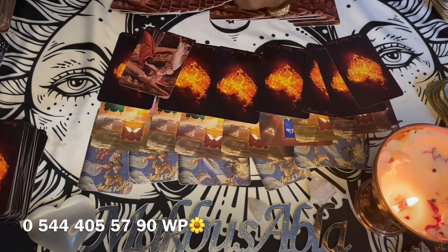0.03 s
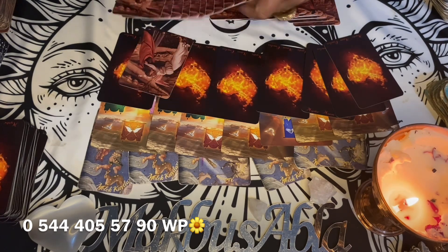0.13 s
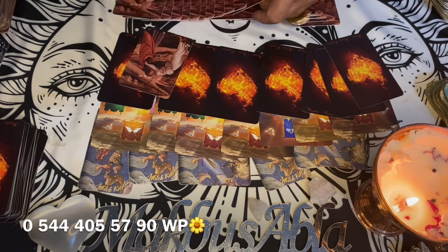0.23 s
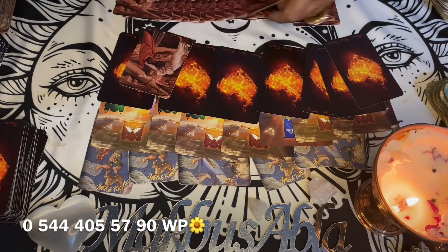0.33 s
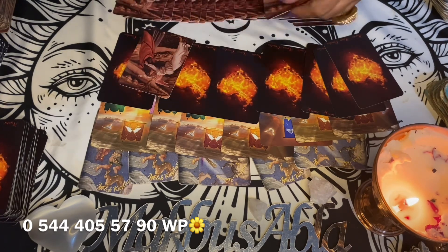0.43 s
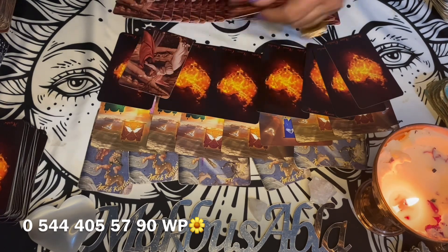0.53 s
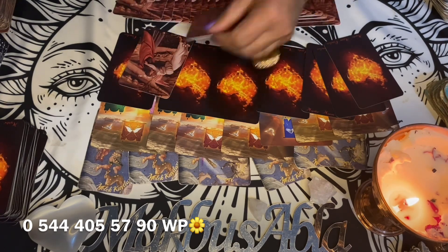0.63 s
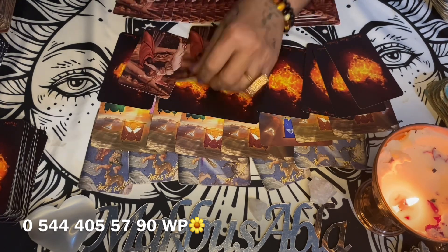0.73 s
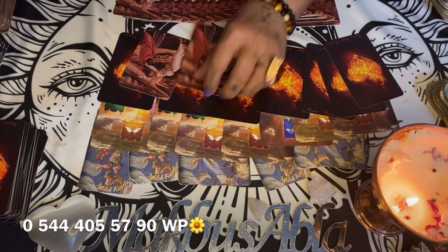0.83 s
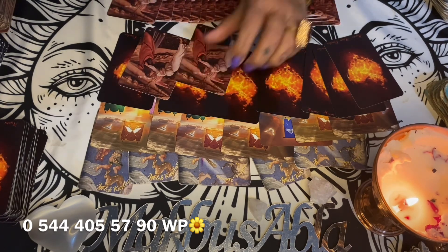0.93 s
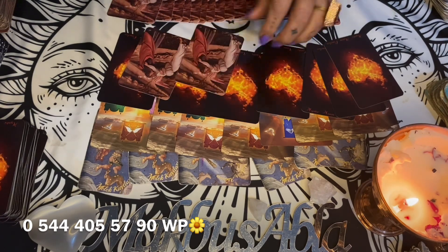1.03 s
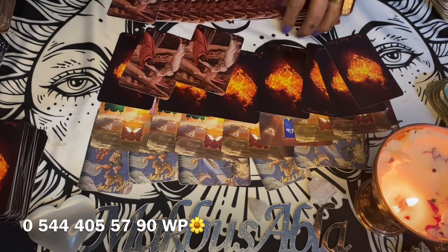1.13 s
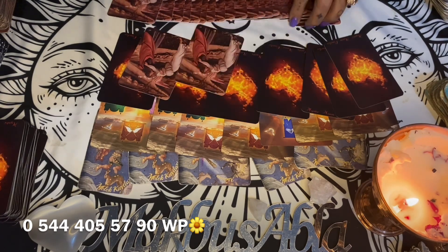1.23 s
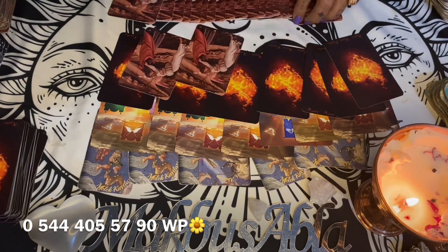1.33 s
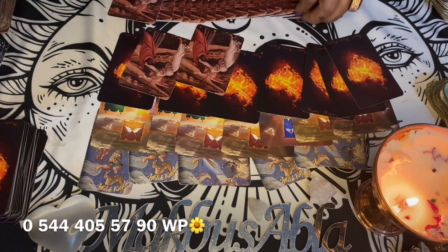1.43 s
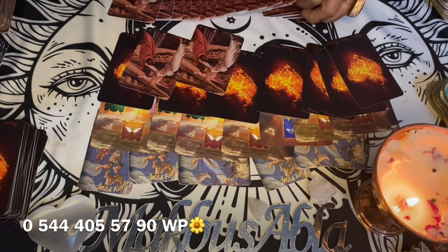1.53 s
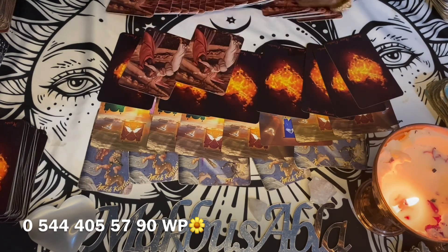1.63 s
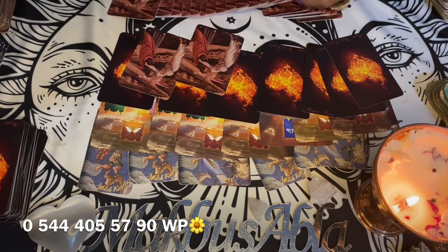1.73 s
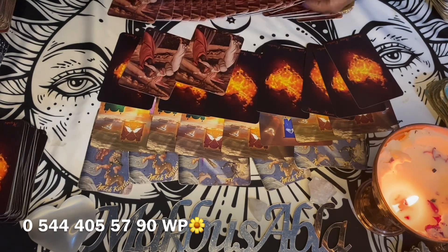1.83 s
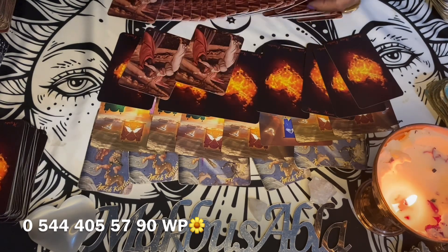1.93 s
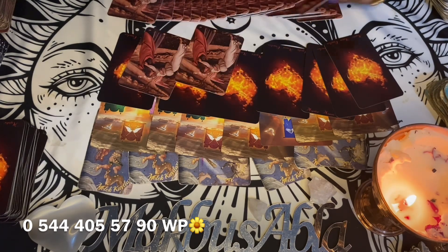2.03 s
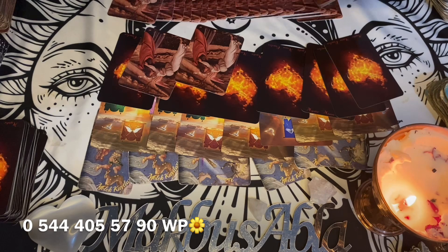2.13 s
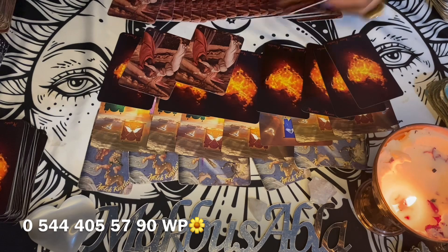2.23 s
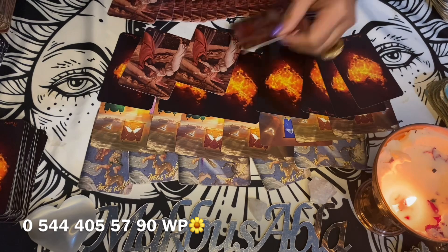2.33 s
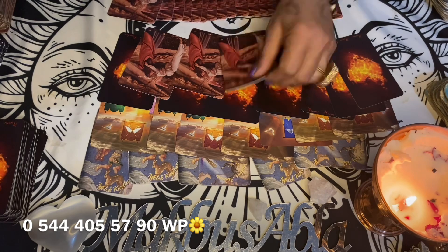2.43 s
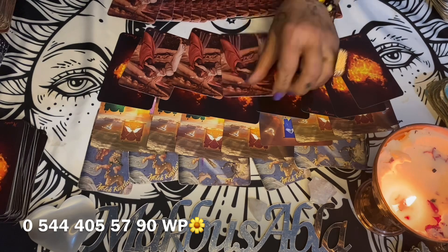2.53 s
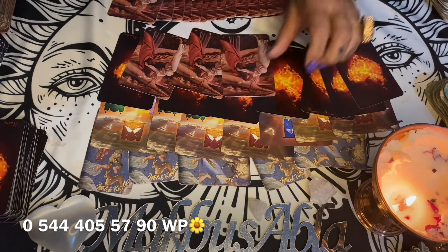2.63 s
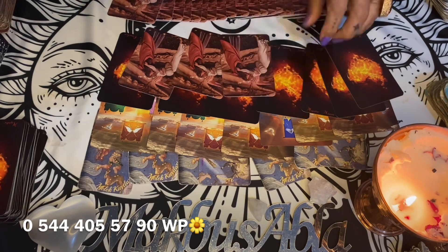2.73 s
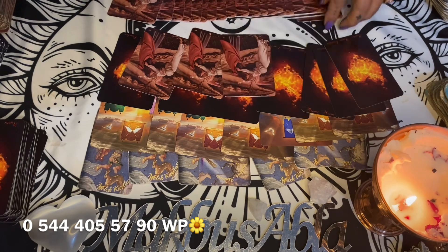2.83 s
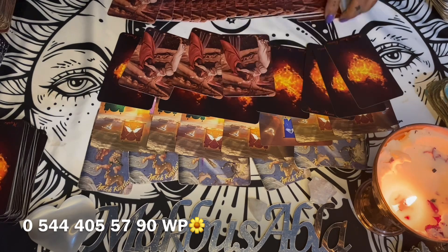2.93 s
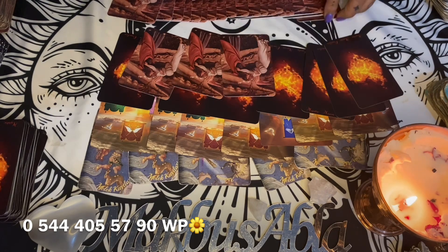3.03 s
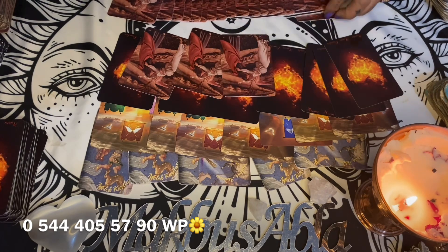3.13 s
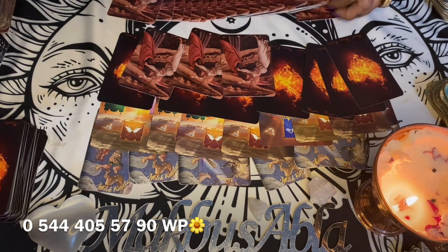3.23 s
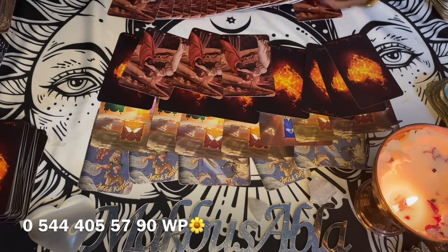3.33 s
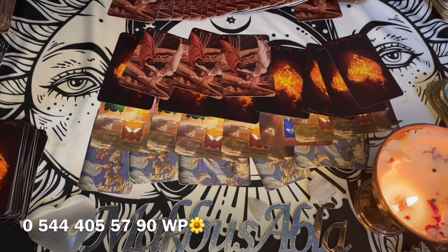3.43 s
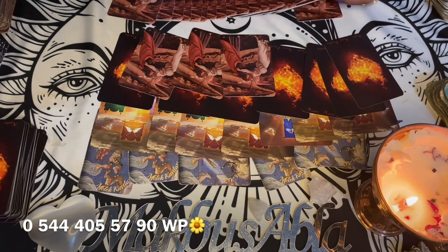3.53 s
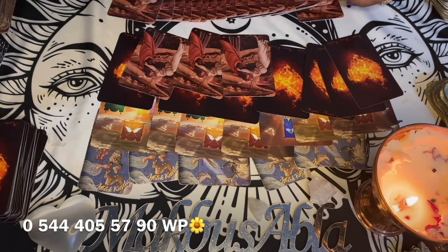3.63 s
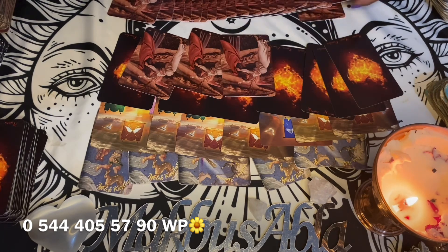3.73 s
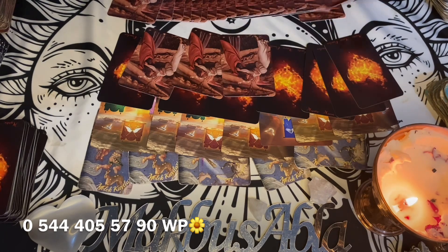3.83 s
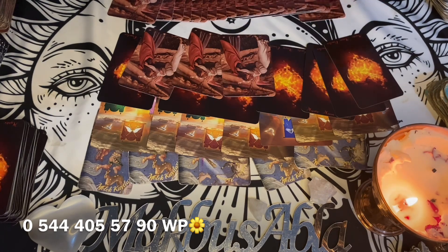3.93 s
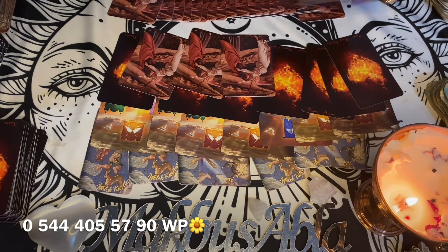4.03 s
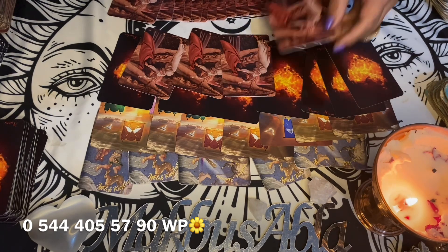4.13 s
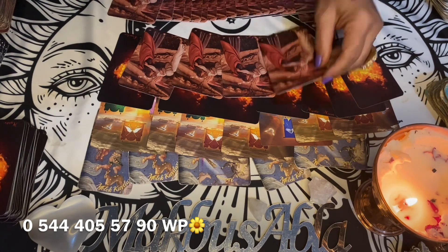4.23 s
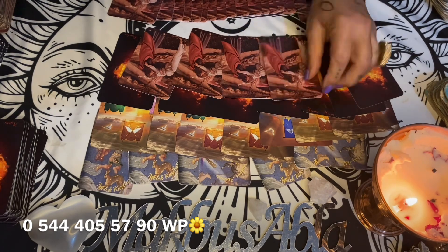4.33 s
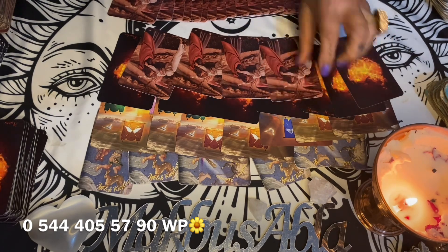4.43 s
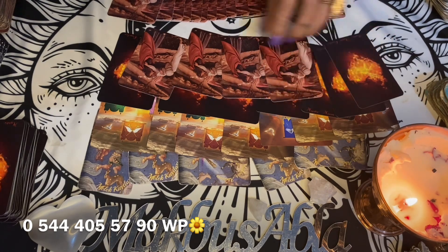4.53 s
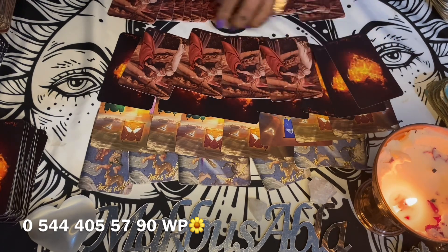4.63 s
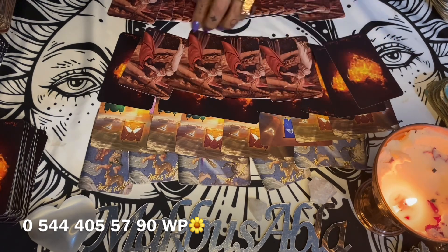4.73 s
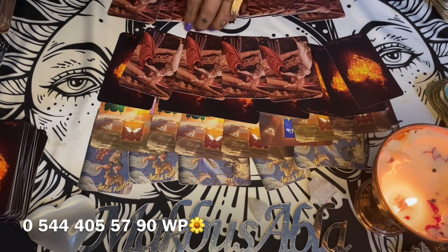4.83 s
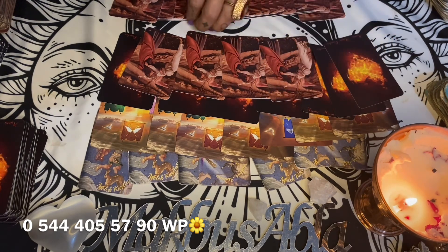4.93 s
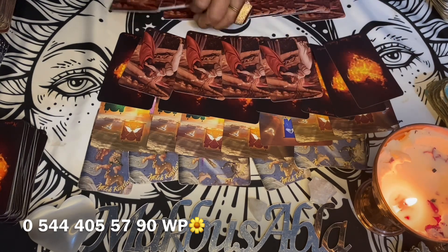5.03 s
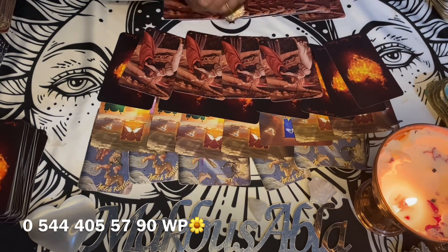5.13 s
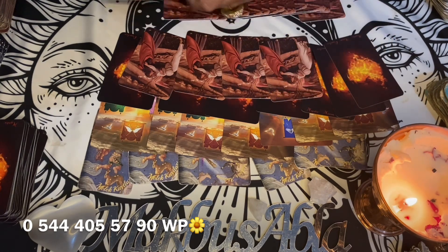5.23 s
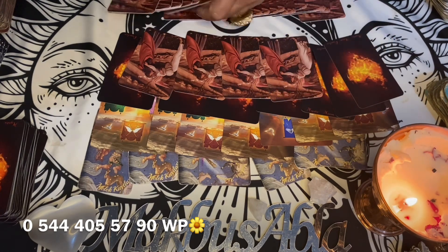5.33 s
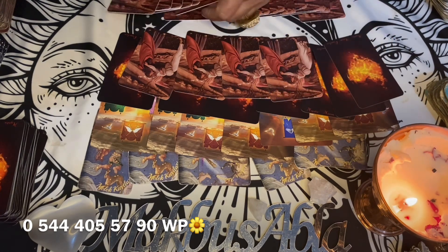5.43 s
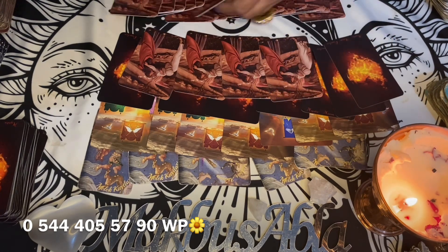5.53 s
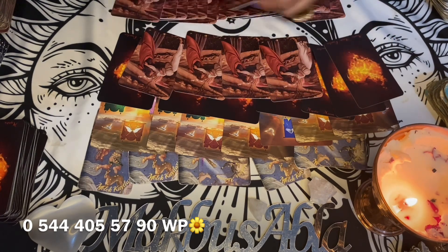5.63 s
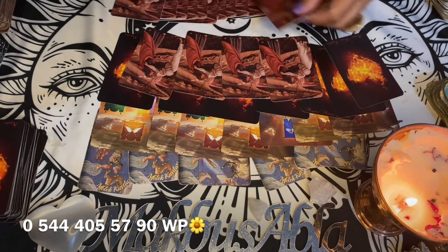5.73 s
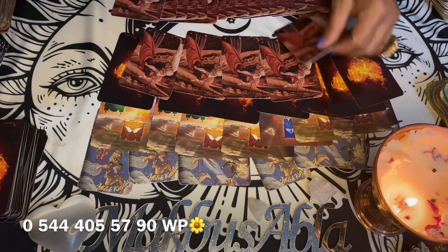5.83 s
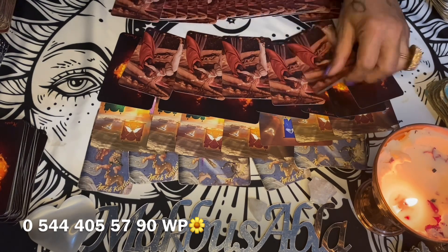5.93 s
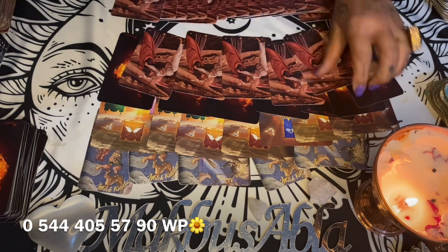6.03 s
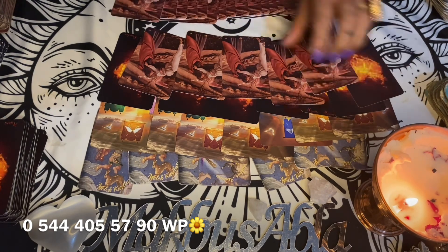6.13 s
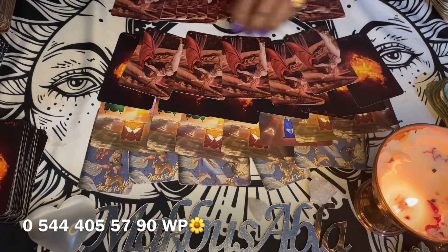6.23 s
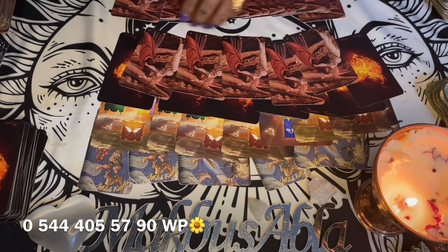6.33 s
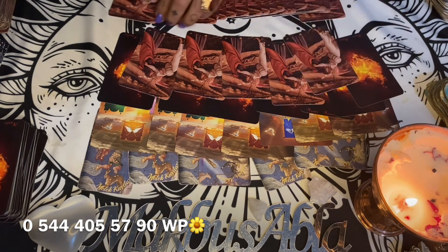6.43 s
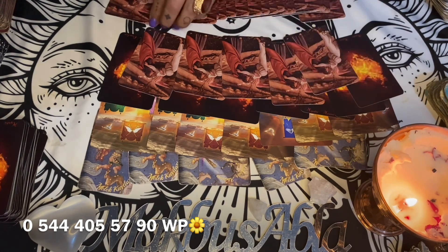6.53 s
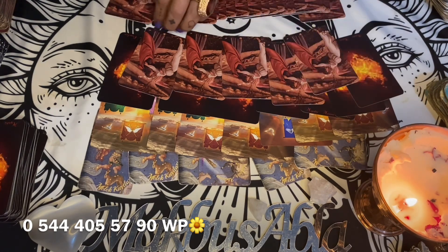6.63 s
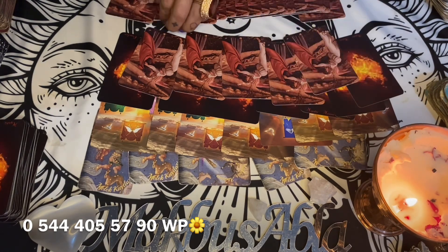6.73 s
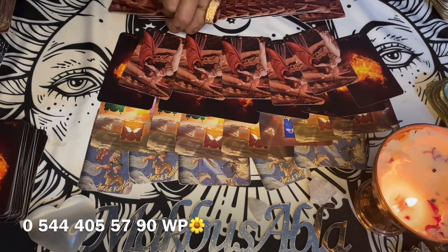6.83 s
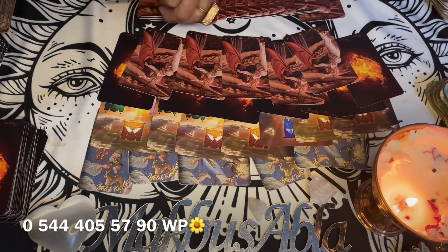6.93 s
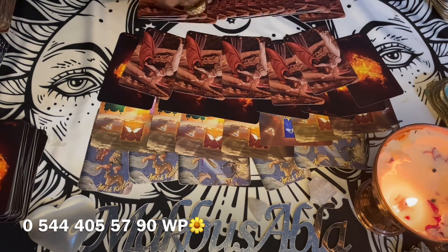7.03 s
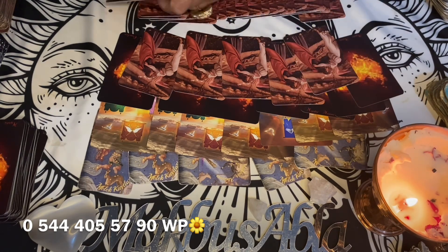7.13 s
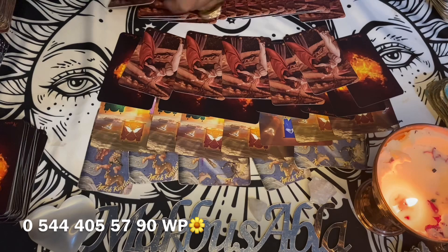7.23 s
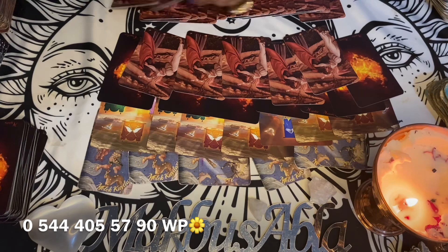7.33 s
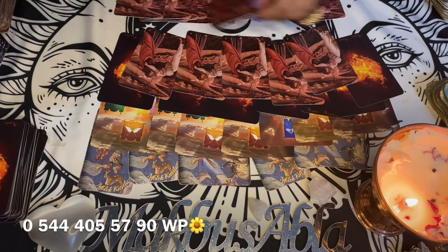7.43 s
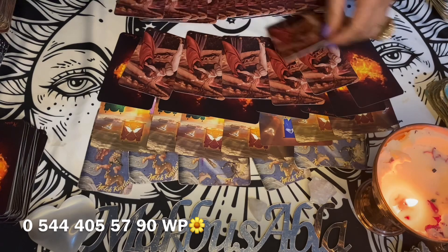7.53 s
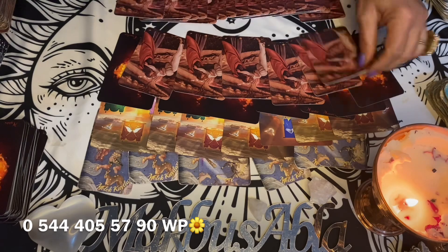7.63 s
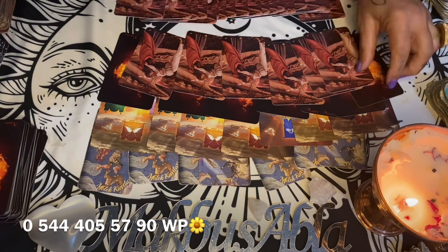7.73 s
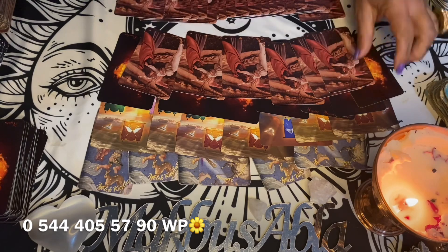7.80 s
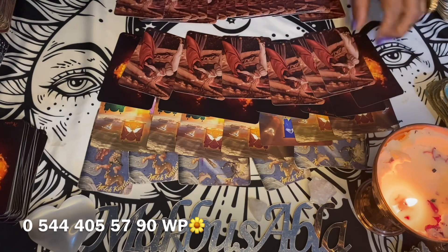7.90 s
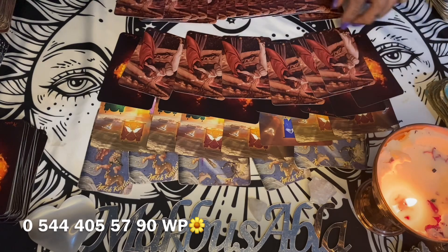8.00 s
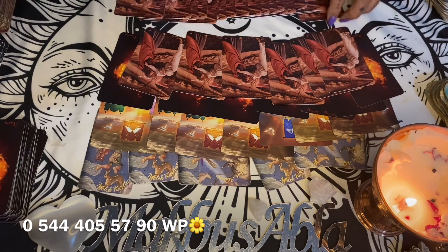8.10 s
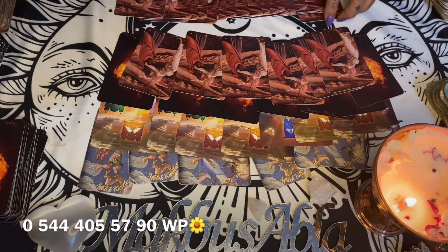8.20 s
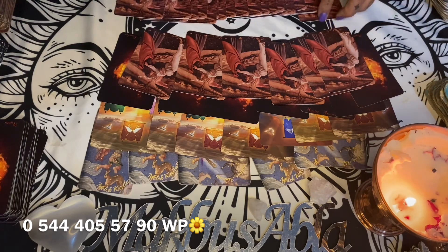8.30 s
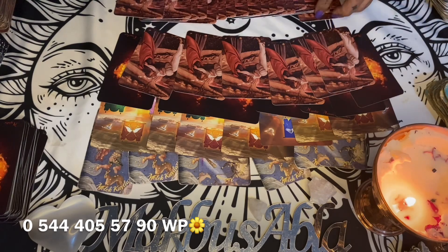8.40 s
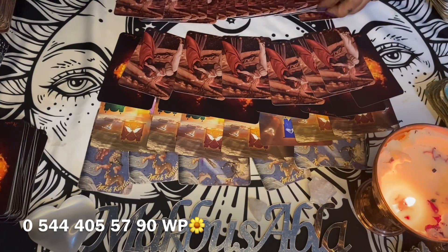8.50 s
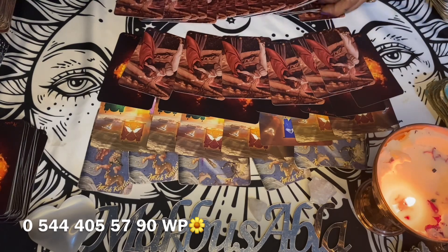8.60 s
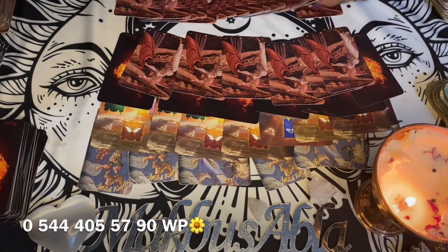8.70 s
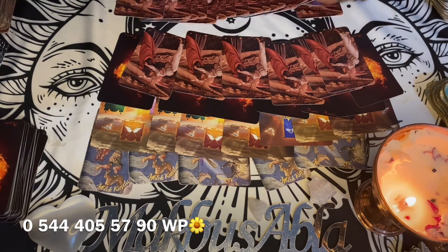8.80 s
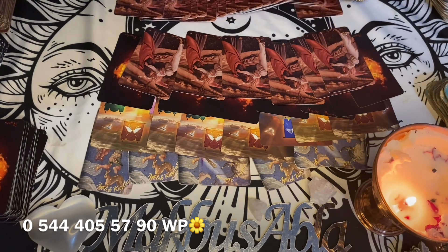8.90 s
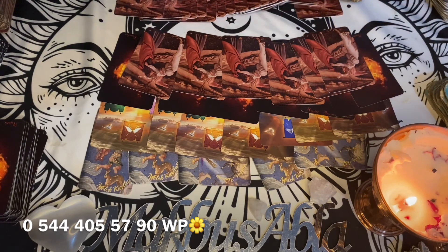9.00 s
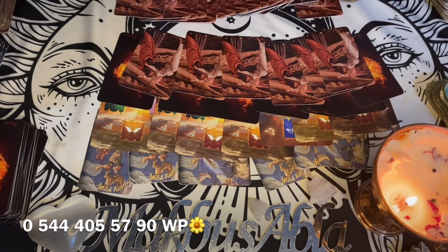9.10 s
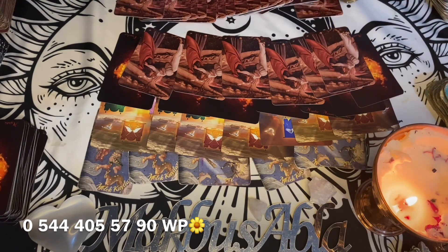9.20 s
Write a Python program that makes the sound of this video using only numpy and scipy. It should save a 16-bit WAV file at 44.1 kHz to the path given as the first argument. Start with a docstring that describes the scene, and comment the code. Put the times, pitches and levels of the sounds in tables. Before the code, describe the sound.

Close stereo pickup in a small room with a steady low machine hum. Stiff cards are dealt at an unhurried pace: crisp edge snaps, brushing slides over cloth and occasional dull knocks from hand and wrist. The sharpest snap comes near two and a half seconds; a short creak with a thin falling squeak comes near seven and a half, before the final flicks.

```python
"""A low machine hum and a faint rustle run throughout; cards and hands sweep the cloth in strokes of shaped noise.
Card edges snap from the first moments, as noise bursts ringing resonances, each with a skid of noise around it.
From 0.6 s wrist and fingers knock the table now and then, as short forces ringing its modes; the sharpest snap
falls near 2.5 s, and near 7.5 s something creaks, as chattering noise with a thin gliding squeak, before the
last snaps. Snaps and knocks also sound through a decaying room; two microphone ports hear the whole."""
import sys
import numpy as np
from scipy import signal
from scipy.fft import rfft, irfft, next_fast_len
from scipy.io import wavfile
from scipy.ndimage import uniform_filter1d, map_coordinates

SR = 44100
rng = np.random.default_rng(int(sys.argv[2]) if len(sys.argv) > 2 else 0)


def transcribe(signal):
    """Save signal, clipped to [-1, 1], as a 16-bit WAV file at the path in sys.argv[1]."""
    frames = np.atleast_2d(signal).T
    limited = np.clip(frames, -1, 1)
    pcm = np.round(limited * 32767).astype(np.int16)
    wavfile.write(sys.argv[1], SR, pcm)


def volts(x):
    """Linear amplitude factor 10**(x/20) for a level x in dB, scalar or array-like."""
    e = np.asarray(x, float) / 20
    return 10 ** e


N = 408366  # samples


def unit(x):
    """Normalization: a signal scaled to rms 1."""
    return x / np.sqrt(np.mean(x ** 2) + 1e-20)


def along(points, hz):
    """Logarithmic frequency scale: (Hz, value) points interpolated along it."""
    knots_hz, values = np.transpose(points)
    return np.interp(np.log(hz + 1), np.log(knots_hz + 1), values)


def wobble(rate):
    """Band-limited fluctuation: a smooth random curve with rate knots a second."""
    knots = rng.standard_normal(int(N * rate / SR) + 4)
    return map_coordinates(knots, [np.arange(N) * rate / SR])


def filtered(x, response):
    """Linear filtering: the spectrum of x times a complex response of frequency."""
    size = next_fast_len(N + SR // 2)
    return irfft(rfft(x, size) * response(np.fft.rfftfreq(size, 1 / SR)), size)[..., :N]


def colour(points):
    """Spectral colouring: the gain curve of a table of (Hz, dB)."""
    return lambda hz: volts(along(points, hz))


def resonant(modes):
    """Modal superposition: causal resonances of (Hz, width Hz, dB), in alternating sign."""
    def response(hz):
        total = 0
        for k, (centre, width, db) in enumerate(modes):
            peak = 1j * hz * width / (centre * centre - hz * hz + 1j * hz * width)
            total = total + (-1) ** k * volts(db) * peak
        return total
    return response


def swell(length):
    """Transient excitation: a burst that swells to 1 after length seconds and dies away."""
    u = np.arange(SR // 4) / SR / max(length, 1 / SR)
    return u * u * np.exp(2 * (1 - u))


def pair(alike, response, patchy_db=0):
    """Interchannel coherence: coloured noise of rms 1 at two ports, in patches of random gain."""
    z = signal.stft(rng.standard_normal((2, N)), nperseg=256)[2]
    field = uniform_filter1d(rng.standard_normal(z.shape[1:]), size=4, axis=0)
    field = uniform_filter1d(field, size=8, axis=1)
    noise = signal.istft(z * volts(patchy_db * unit(field)), nperseg=256)[1][:, :N]

    def mixing(hz):
        angle = np.arccos(np.clip(along(alike, hz), -1, 1)) / 2
        return response(hz) * [np.cos(angle), np.sin(angle)]

    mid, side = filtered(noise, mixing)
    return unit(np.array([mid + side, mid - side]))


# likeness of the two ports for sounds close by: frequency_hz, coherence (0-1)
NEAR_LIKENESS = [(300, .97), (600, .55), (1000, .85), (1800, .95), (2900, .6), (3800, .8), (4500, .7),
                 (5500, .975), (16000, .975)]


def rung(envelope, modes):
    """Forced resonance: enveloped noise rings modes, at rms 1 where the envelope stays at 1."""
    noise = pair(NEAR_LIKENESS, np.ones_like)
    return filtered(envelope * noise, resonant(modes)) / np.std(filtered(noise, resonant(modes)))


# card edges and nails catching and letting go; the last three levels are relative to level_db:
# time_s, level_db, lowest_resonance_db, upper_resonances_db, hiss_db
SNAPS = [(0.132, -54.5, -15, -6, -10), (0.2149, -51, 7.5, 3, 1), (0.333, -58.5, 0, -12, -9),
         (0.637, -45, 0, -8.5, -6.5), (0.7051, -41.5, -7, -4.5, -28), (0.7162, -37.5, 2, -6, -12),
         (0.7568, -41, 2, 1, -2.5), (0.8079, -44.5, -4, 0.5, -3.5), (0.8275, -53.5, -14, -0.5, -24),
         (0.8928, -56, 0, 0, -16), (1.1554, -49.5, -6.5, -25, -38), (2.0646, -41.5, -2, -0.5, 0.5),
         (2.3455, -47, -3, -6.5, -25), (2.4794, -28.5, -15.5, 0.5, -5.5), (2.5025, -33, -29, -2.5, -6.5),
         (2.845, -56.5, 5.5, -20.5, -19.5), (3.0667, -55, -13, -13.5, -2), (3.6006, -46, 3.5, 3.5, 0),
         (3.848, -55, -4, -12.5, -3), (4.1798, -46.5, 1.5, -8, -21), (4.2007, -47, -2, -6, -2),
         (4.286, -57, -9.5, 1.5, -2.5), (4.3109, -33, 2.5, 5, 6.5), (4.3215, -37.5, -26, -5.5, 2),
         (4.3312, -38, -15, -1, -19.5), (4.5535, -60, 8, -6, 8), (4.7116, -59.5, -2.5, 1.5, -2.5),
         (4.833, -62, 11, -12, -27), (5.236, -69.5, -12, 5.5, 18.5), (5.561, -50.5, -10, -2, -3.5),
         (5.599, -46.5, -13, -2.5, -2), (5.7634, -55, 0, -13, -24), (5.773, -43, -4, -15, -10.5),
         (5.9353, -41, -3.5, -9, -5), (5.9456, -43, -14, -0.5, -1), (5.9556, -41, -16, -3, -2.5),
         (5.9717, -47, -9, -4, -7.5), (5.9852, -37.5, -17, -2, -2.5), (7.009, -61.5, -14, -30, -8),
         (7.059, -64, -2, -25, -20), (7.218, -60, -17.5, 3, 0), (7.352, -41, -14, -4, -5),
         (7.3591, -37.5, -18, -3, -12.5), (7.4816, -56, -5, -12, -27), (7.505, -50, -24, -21.5, -8),
         (7.6617, -44.5, -9.5, -2, -2.5), (7.6751, -41.5, -5, 5, -0.5), (7.7012, -44, -1, 3.5, -0.5),
         (8.096, -54.5, -5, -7, 1.5), (8.554, -73.5, -4, 8, 20), (8.5846, -71, 1, 1, 14.5),
         (8.982, -64.5, 5, -8, 2), (8.6773, -46, -8.5, -3.5, 4.5), (8.6974, -37.5, -5, 0, -4.5),
         (9.01, -52, -5, -3, 7), (9.0192, -49.5, -9, -3, -20.5), (9.0437, -59, -1, -4, -18)]
# resonances that colour the snaps: frequency_hz, width_hz, level_db
SNAP_RESONANCES = [(1050, 450, 0), (1980, 480, 0), (3230, 450, 0), (3950, 500, -4), (5110, 600, 0)]
# colour of the snap's hiss: frequency_hz, gain_db
SNAP_HISS = [(4500, -27.5), (6000, -5), (10000, -6), (14000, -10), (15800, -13), (16600, -50.5)]


def snaps():
    """Sudden release: a short burst rings resonances at its own strengths, with a hiss on top."""
    rise_s = 0.002
    burst = np.zeros((5, N + SR // 4))
    shape = swell(rise_s) + 0.2 * swell(4 * rise_s)  # the card flutters on a little
    for s, db, low_db, upper_db, hiss_db in SNAPS:
        edge_db = (upper_db + hiss_db) / 2 - 2.5  # the top resonance lies between ring and hiss
        strength = volts(db + np.array([low_db, 0, upper_db, edge_db, hiss_db]))
        start = round((s - .0015) * SR)
        burst[:, start:start + SR // 4] += np.outer(strength, shape)
    low, body, upper, edge, hiss = burst[:, :N] / 2 ** .5  # peak to rms
    ring = rung(low, SNAP_RESONANCES[:1]) + rung(body, SNAP_RESONANCES[1:2])
    ring = ring + rung(upper, SNAP_RESONANCES[2:4]) + rung(edge, SNAP_RESONANCES[4:])
    return ring + hiss * pair(NEAR_LIKENESS, colour(SNAP_HISS))


# course of the creak: time_s, lower_bands_db, upper_bands_db, squeak_hz, squeak_db
CREAK = [(7.43, -80, -85, 2300, -90), (7.445, -61, -69, 2300, -90), (7.5, -63, -79, 2300, -85),
         (7.51, -52, -53, 2300, -63), (7.53, -65.5, -66, 2150, -58), (7.56, -64, -64, 1900, -60),
         (7.6, -69, -67, 1780, -61), (7.63, -72, -76, 1750, -83)]
# bands of the creak, each passed through twice: frequency_hz, width_hz, level_db (per pass)
CREAK_BANDS = [(740, 130, -3), (1500, 210, 0), (2420, 170, 0), (3950, 300, -9)]


def creak():
    """Amplitude modulation: a creak chatters in four bands; a thin squeak and its octave glide down."""
    s, *columns = np.transpose(CREAK)
    t = np.arange(N) / SR
    low_db, high_db, squeak_hz, squeak_db = (np.interp(t, s, v) for v in columns)
    flutter = unit(volts(5 * wobble(130)))

    def band(modes):
        return pair(NEAR_LIKENESS, lambda hz: resonant(modes)(hz) ** 2)

    chatter = flutter * (volts(low_db) * band(CREAK_BANDS[:2]) + volts(high_db) * band(CREAK_BANDS[2:]))
    phase = 2 * np.pi * np.cumsum(squeak_hz + 80 * wobble(300)) / SR
    tone = np.sin(phase) + volts(-11) * np.sin(2 * phase)
    squeak = volts(squeak_db + 3 * wobble(80)) * tone
    return (chatter + squeak) * ((t > s[0]) & (t < s[-1]))


# strokes of cards and hands over the cloth: middle_s, length_s, weave_db, hollow_db, hiss_db
STROKES = [(0.05, 0.13, -81, -67, -84.5), (0.149, 0.15, -71.5, -69.5, -64.5), (0.267, 0.16, -70, -65, -68),
           (0.655, 0.097, -75, -66, -78), (0.817, 0.19, -62.5, -60, -62.5),
           (1.093, 0.52, -73.5, -72.5, -77), (1.26, 0.094, -64.5, -75, -63),
           (1.372, 0.15, -71.5, -69.5, -71.5), (1.698, 0.16, -81, -73, -87), (1.857, 0.3, -84, -74, -75.5),
           (2.027, 0.12, -67.5, -69, -59.5), (2.422, 0.14, -65.5, -65.5, -71.5),
           (2.866, 0.29, -69.5, -70.5, -68), (3.108, 0.18, -76, -82, -76.5), (3.36, 0.053, -95, -95, -82),
           (3.57, 0.28, -70, -73.5, -66.5), (3.75, 0.18, -70.5, -70, -71), (3.837, 0.078, -64, -63, -62),
           (4.25, 0.092, -69, -67.5, -76.5), (4.585, 0.51, -64, -61, -63.5), (4.93, .26, -70.5, -78, -74),
           (5.341, 0.17, -75.5, -103, -64.5), (5.534, 0.13, -66.5, -73, -59.5),
           (5.593, 0.062, -56.5, -54.5, -62), (5.851, 0.25, -65, -64, -69.5),
           (5.967, 0.048, -51, -48.5, -56), (6.11, 0.27, -74, -74, -76.5), (6.45, 0.18, -64.5, -66.5, -65),
           (6.766, 0.28, -71, -80, -71.5), (7.008, 0.17, -94, -80, -75.5), (7.178, .07, -74, -87, -66),
           (7.301, 0.14, -59, -59.5, -57.5), (7.568, 0.28, -65.5, -63.5, -65.5),
           (8.046, 0.38, -64.5, -63, -64.5), (8.35, 0.096, -82, -79, -75), (8.658, 0.13, -61.5, -67, -63),
           (8.823, .2, -78, -86, -80), (8.992, 0.13, -72, -82, -68), (9.154, 0.19, -70.5, -74, -72)]
# faint rustle that never stops: weave_db, hollow_db, hiss_db
REST_DB = (-88.5, -82, -89.5)


def rubbing():
    """Power addition: rest, strokes and a skid around each snap sum to weave, hollow and hiss strength."""
    end_fall_db, flatness = 10.5, 1.5  # fall at the ends of a stroke; higher = flatter top, steeper ends
    skid_db = np.array((-18.5, -14, -24))  # under the snap: weave, hollow, hiss
    skid_t60_s, drag_t60_s = 0.35, 0.041  # a released card skids on; the skid builds up just before
    t = np.arange(0, N / SR + .002, .002)
    power = volts(2 * np.array(REST_DB))[:, None] * np.ones(len(t))
    for middle, length, *dbs in STROKES:
        fall_db = end_fall_db * np.abs(2 * (t - middle) / length) ** flatness
        power += np.outer(volts(2 * np.array(dbs)), volts(-2 * fall_db))
    for s, db, low_db, upper_db, hiss_db in SNAPS:
        dbs = db + skid_db + [upper_db, low_db / 2, hiss_db]
        fall_db = 60 * np.abs(t - s) / np.where(t > s, skid_t60_s, drag_t60_s)
        power += np.outer(volts(2 * dbs), volts(-2 * fall_db))
    return [np.interp(np.arange(N) / SR, t, np.sqrt(p)) for p in power]


# colour of rubbing on the weave: frequency_hz, gain_db
WEAVE = [(2000, -18), (2700, 2), (3250, -2.5), (3900, -1.5), (4500, -1.5), (5100, 0), (6500, -3.5),
         (8000, -57)]
# hollow colour of a bent card: frequency_hz, gain_db
HOLLOW = [(350, -1.5), (650, 0.5), (1100, -3.5), (1500, -2), (2100, -0.5), (2600, -10), (3500, -31)]
# hiss of a fast edge: frequency_hz, gain_db
EDGE_HISS = [(5000, -11.5), (7000, -11), (9000, -1), (11000, -2.5), (13500, -1.5), (15000, -18),
             (16000, -33)]


def slide():
    """Friction noise: dense uneven slips on the weave; a bent card adds hollow colour, a fast edge hiss."""
    level, hollow, bright = rubbing()
    grit = unit(volts(0.37 * wobble(21) + 0.8 * wobble(130) + 0.96 * wobble(600)))  # slips come in clumps
    rub = level * pair(NEAR_LIKENESS, colour(WEAVE), patchy_db=2.5)
    rub = rub + hollow * pair(NEAR_LIKENESS, colour(HOLLOW), patchy_db=3.5)
    rub = rub + bright * pair(NEAR_LIKENESS, colour(EDGE_HISS), patchy_db=3.5)
    return grit * rub


# wrist and fingers on the table top; the last three levels are relative to level_db, before the
# fixed gain of each group of modes: time_s, level_db, knuckle_db, tap_db, frame_db
KNOCKS = [(0.638, -46.5, 2.5, -4, -20), (0.718, -48.5, 1, 13, -15), (1.161, -33, -11, -9.5, -17),
          (2.063, -47, 10, 4, -6.5), (2.479, -44, 5, 11.5, -21), (2.845, -35, -0.5, -32, -10.5),
          (4.312, -47, -3, 8, -20), (4.701, -39, -22, -20, -21), (4.835, -42, 3.5, -5, -12),
          (6.696, -47, 13.5, -22, -9), (8.358, -55, 7, -17, 4), (8.699, -47.5, -9, 5.5, 8)]
# resonances of the table top: frequency_hz, width_hz, level_db
TABLE_MODES = [(180.7, 40, 0.5), (281.3, 51, 2), (375, 138, -1.5), (553, 26, -5), (860, 120, -7.5),
               (929, 50, -4), (1410, 190, -3), (1780, 150, 4.5), (2580, 350, 5.5)]
# resonances of the table frame: frequency_hz, width_hz, level_db
FRAME_MODES = [(65, 30, -14), (122, 9, 0)]


def knocks():
    """Impact: a soft push rings the top; knuckles wake middle modes, nail or ring the highest, weight the frame."""
    force = np.zeros((4, N + SR // 4))
    push = swell(0.00017) / swell(0.00014).sum()
    for s, db, knuckle_db, tap_db, frame_db in KNOCKS:
        scuff = rng.standard_normal(SR // 4)
        drag = swell(0.009) * scuff / np.linalg.norm(swell(0.0053))
        strength = volts(db + np.array([40, knuckle_db + 39, tap_db + 29.5, frame_db + 55]))
        start = round((s - .001) * SR)
        force[:, start:start + SR // 4] += np.outer(strength, push + 0.26 * drag)
    groups = TABLE_MODES[:3], TABLE_MODES[3:6], TABLE_MODES[6:], FRAME_MODES
    ring = sum(filtered(f[:N], resonant(modes)) for f, modes in zip(force, groups))
    return filtered(ring, lambda hz: 1 / (1 + 1j * hz / 2600) ** 3)  # flesh and cloth soften the contact


# reverberation time of the room: frequency_hz, t60_s
ROOM_DECAY = [(200, 0.37), (1000, 0.34), (3000, 0.76), (8000, 0.1), (14000, 0.12)]


def room(x):
    """Reverberation: each frequency dies at its own speed; four noise tails take turns, a third of a second each."""
    turn = np.arange(N) // (SR // 3) % 4
    wet = np.zeros((2, N))
    for k in range(4):
        noise = pair(NEAR_LIKENESS, np.ones_like)[:, :SR // 2]
        hz, t, z = signal.stft(noise, SR, nperseg=256)
        decay = volts(-60 * t / along(ROOM_DECAY, hz)[:, None])
        tail = signal.istft(z * decay, SR, nperseg=256)[1]
        late = np.pad(x.mean(0) * (turn == k), (200, 0))  # delay in samples
        wet += signal.fftconvolve(late[None], tail / np.linalg.norm(tail[0]), axes=1)[:, :N]
    return wet


# partials of the machine hum: frequency_hz, level_db (before a common gain), waver_hz, swing_db
HUM = [(51.5, -60.5, 3, 0.5), (94.7, -65.5, 3, 2.5), (123, -65, 5.6, 2.5), (180.8, -65, 5, 2),
       (233.75, -52.5, 0.68, 0.5), (277.3, -76, 3, -1.5), (427.2, -65.5, 1.58, 0), (441, -71.5, 2, -1),
       (508.8, -72, 1.35, 1.5)]
# colour of the diffuse rumble: frequency_hz, gain_db
RUMBLE = [(12, -40.5), (20, -25), (33, -11), (58, -3.5), (177, -4.5), (209, -5), (232, -6), (258, -12.5),
          (281, -7), (312, -13.5), (376, -10.5), (427, -10.5), (610, -20.5), (1070, -30), (1970, -32.5),
          (3000, -43.5), (3900, -89), (6600, -120)]
# likeness of the two ports for the rumble: frequency_hz, coherence (0-1)
DIFFUSE_LIKENESS = [(60, .995), (200, 0.84), (400, 0.18), (700, 0.083), (1500, 0.062), (2000, 0.45),
                    (3000, .1)]
# slow drift of the deepest hum and rumble: time_s, gain_db
DRIFT = [(0, -4), (1, 0), (2, 0), (3, 1), (4, 0.5), (5, 0), (6, -1), (7, -1.5), (8, -1.5), (9.26, 0.5)]


def hum():
    """Additive synthesis: wavering partials over a low diffuse rumble; the deepest part drifts in level."""
    t = np.arange(N) / SR
    lines = np.zeros(N)
    for hz, db, waver_hz, swing_db in HUM:
        level = volts(db + 2.5 + swing_db * wobble(9))
        cycles = hz * t + waver_hz * np.cumsum(wobble(20)) / SR
        lines += level * np.sin(2 * np.pi * cycles)
    steady = lines + volts(-57) * pair(DIFFUSE_LIKENESS, colour(RUMBLE), patchy_db=2.0)
    s, db = np.transpose(DRIFT)
    deep = filtered(steady, lambda hz: 1 / (1 + (hz / 140) ** 4))
    return steady + deep * (volts(np.interp(t, s, db)) - 1)


# colour of the snaps' room tail, with peaks near 2.1 and 3.1 kHz: frequency_hz, width_hz, level_db
SNAP_TAIL = [(1000, 500, -26.5), (2120, 230, -14.5), (3140, 140, -9.5), (3600, 620, -17.5),
             (5000, 1500, -20)]


def scene():
    """Superposition: snaps and knocks, direct and through the room, over rubbing, creak and hum."""
    cards = snaps()
    table = knocks() * np.ones((2, 1))
    cards_wet = filtered(cards, resonant(SNAP_TAIL))
    return cards + table + room(cards_wet + volts(-3.5) * table) + slide() + creak() + hum()


def top_cut(x):
    """Nothing passes above the cut-off."""
    return signal.sosfilt(signal.butter(12, 16690, fs=SR, output="sos"), x)


# phase by which the left microphone port leads: frequency_hz, lead_rad
PORT_LEAD = [(0, 0), (2000, .1), (3200, .7), (5000, .4), (7550, 3.14), (10500, 6.28), (13400, 9.42),
             (15900, 12.56)]
# level of the left port over the right: frequency_hz, difference_db
PORT_LEAN = [(60, -.1), (230, -1.1), (500, -2), (1000, -1), (3000, -3), (5000, -.5), (8000, 0)]


def record(dry):
    """Interchannel differences: the left port leads, mostly more with pitch; the middle range leans right."""
    knots_hz, lead_rad = np.transpose(PORT_LEAD)

    def half(hz):
        return volts(along(PORT_LEAN, hz) / 2) * np.exp(.5j * np.interp(hz, knots_hz, lead_rad))

    ports = filtered(dry, lambda hz: np.array([half(hz), 1 / half(hz)]))
    return top_cut(ports)


dry = scene()
out = record(dry)
transcribe(out)
```